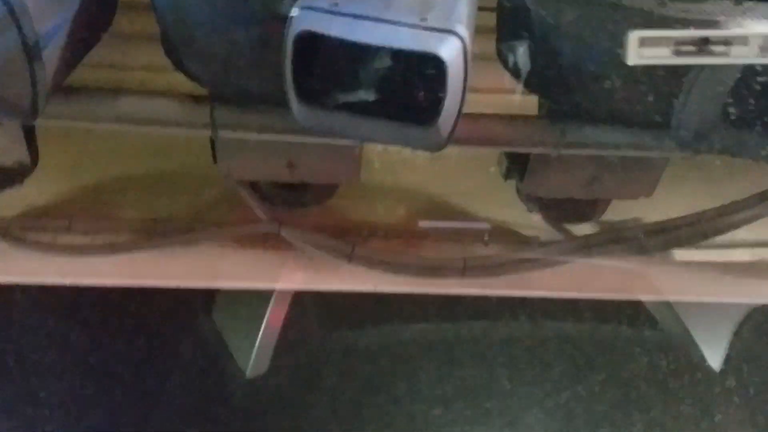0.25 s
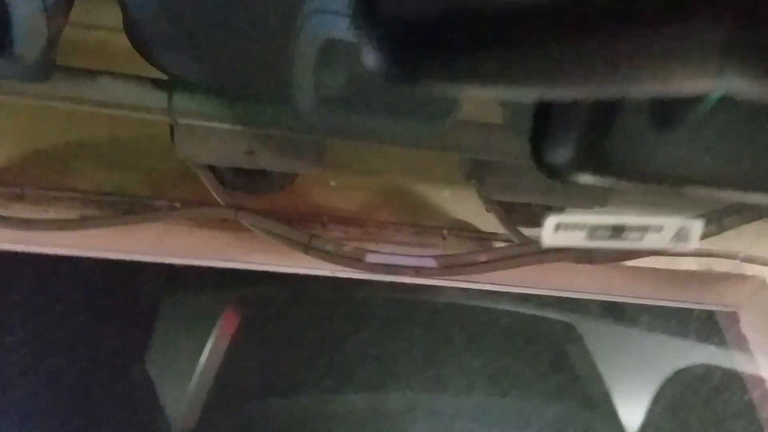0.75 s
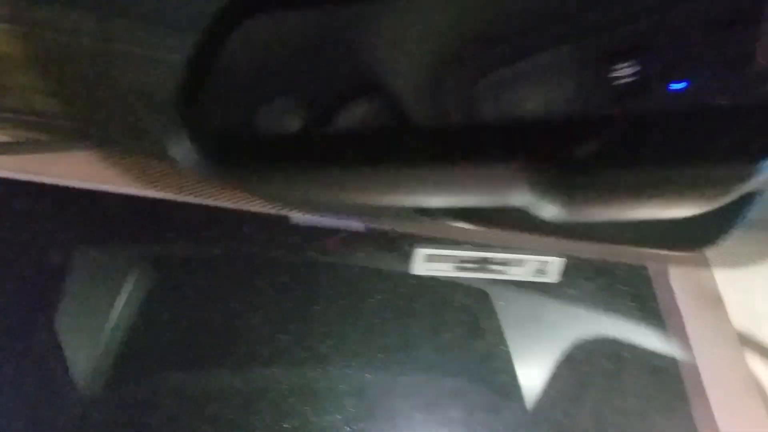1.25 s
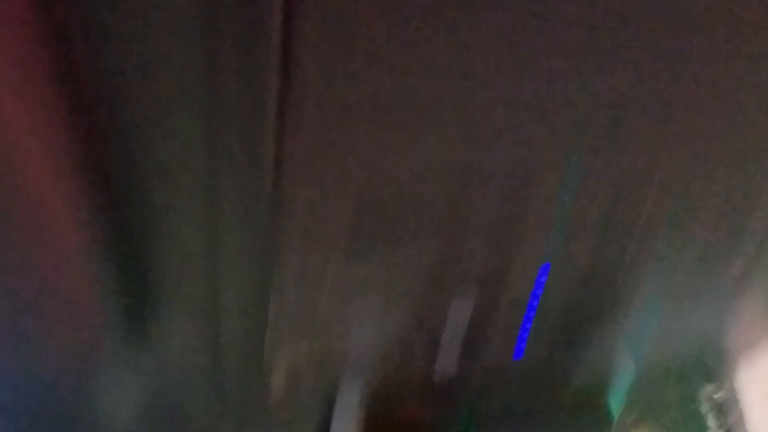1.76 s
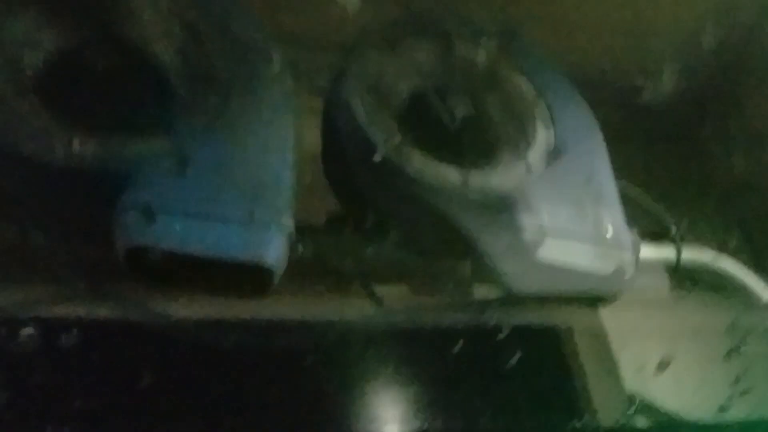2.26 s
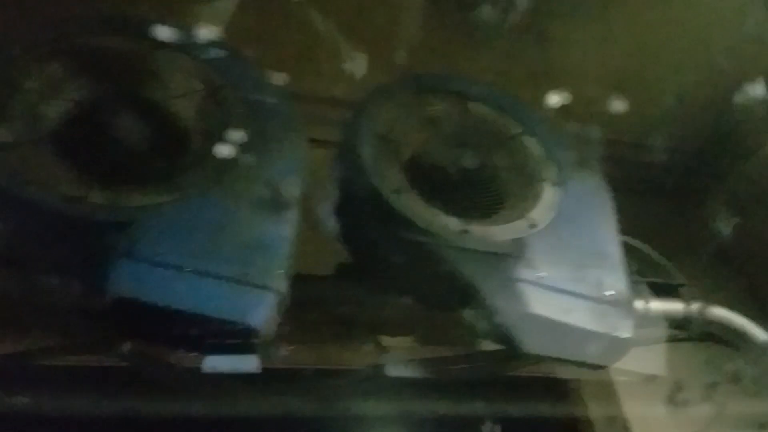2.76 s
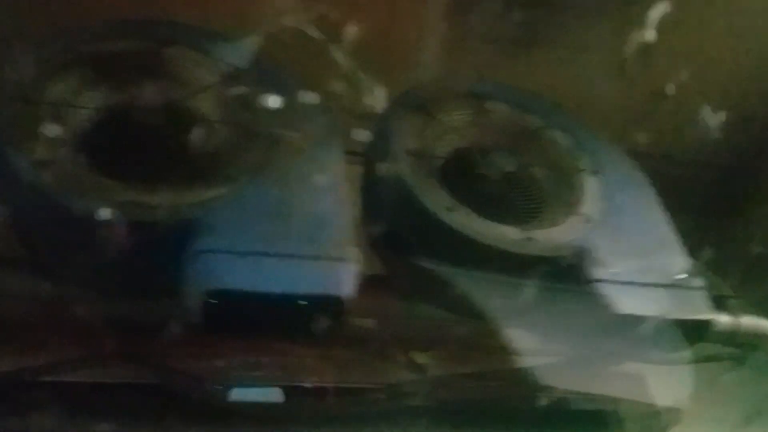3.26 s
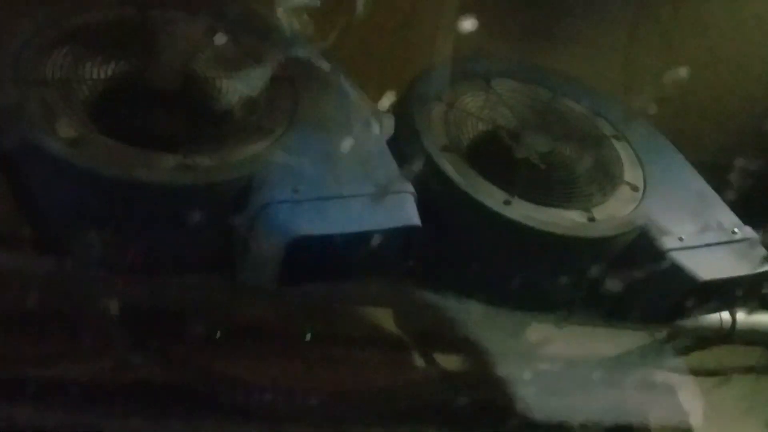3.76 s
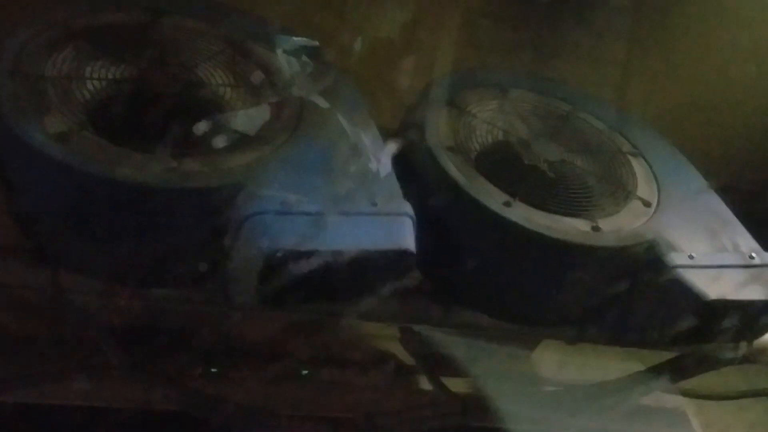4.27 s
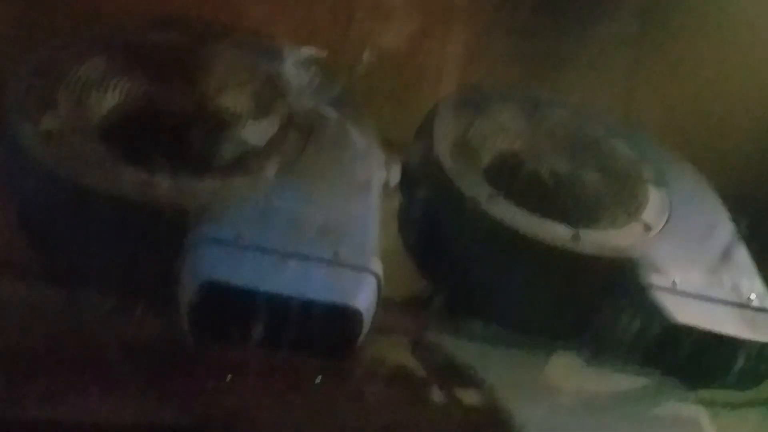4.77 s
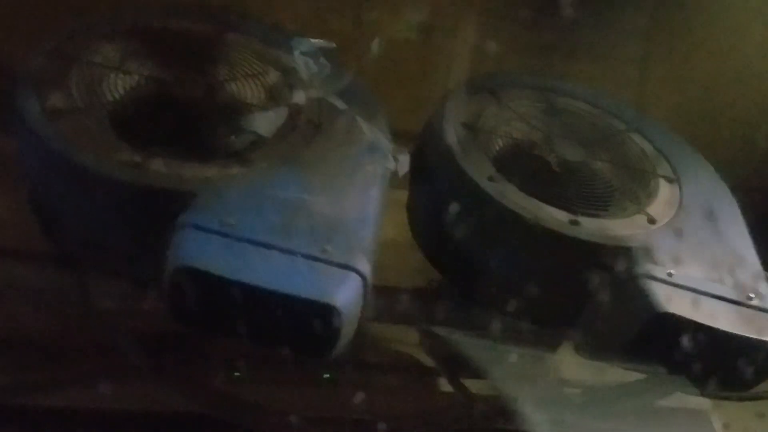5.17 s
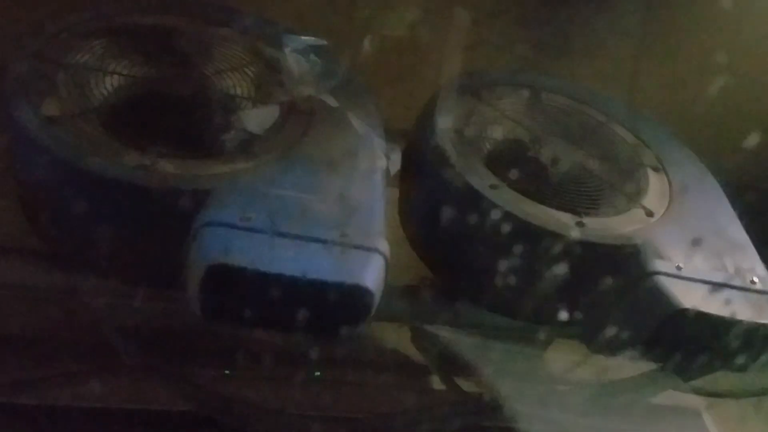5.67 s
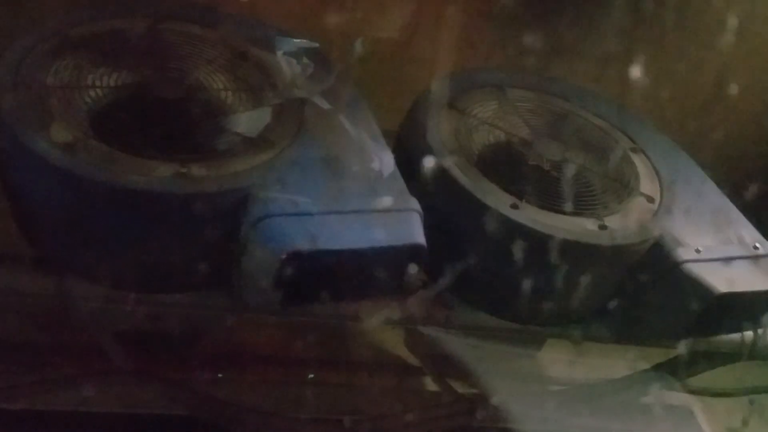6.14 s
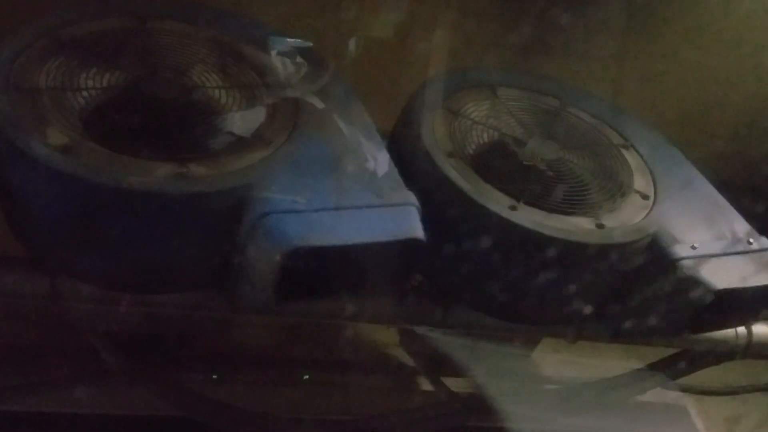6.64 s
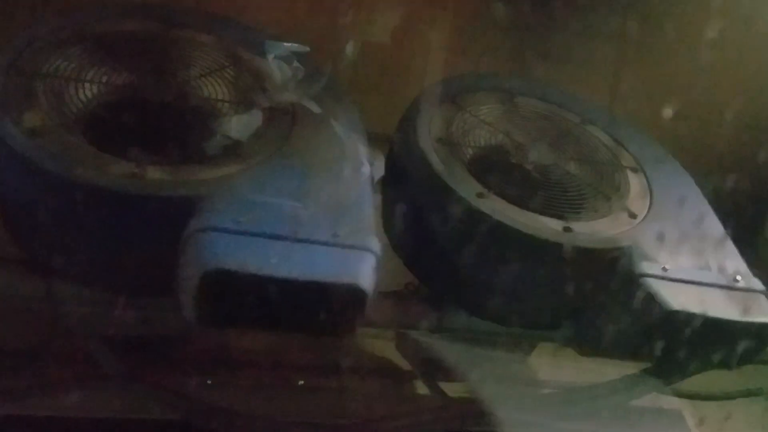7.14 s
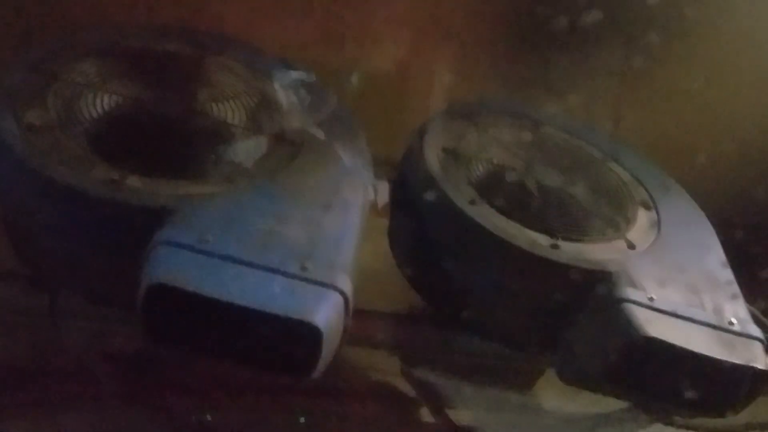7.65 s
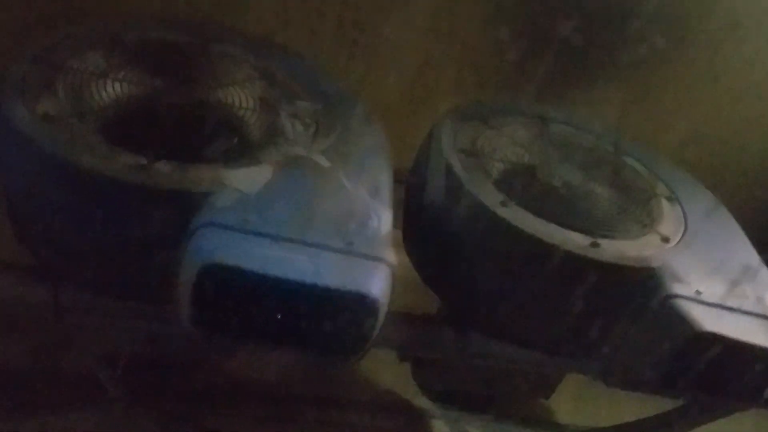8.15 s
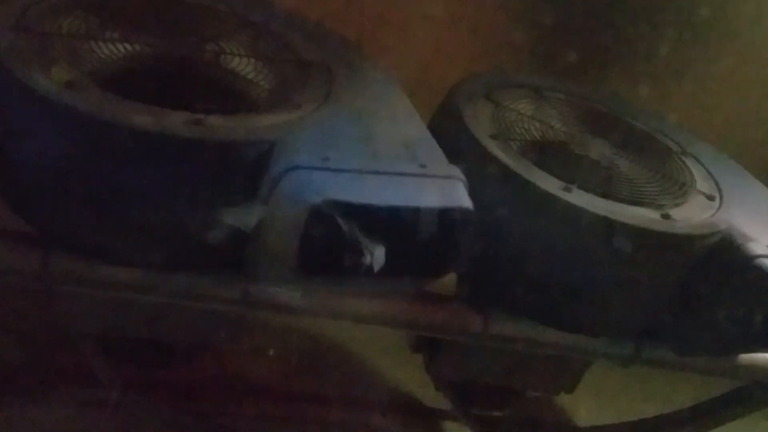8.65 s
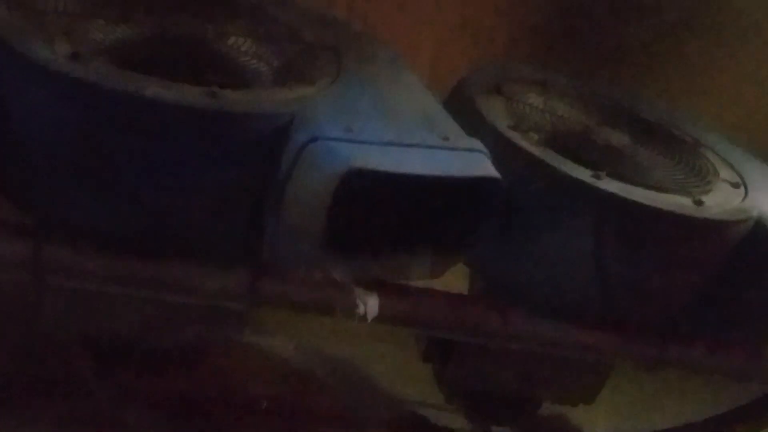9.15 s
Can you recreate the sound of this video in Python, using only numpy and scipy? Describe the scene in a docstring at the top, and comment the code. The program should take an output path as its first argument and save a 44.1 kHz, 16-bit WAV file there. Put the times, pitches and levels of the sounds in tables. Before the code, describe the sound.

Inside a car at a car wash, big dryer blowers roar steadily over the glass with low buffeting, wavering whine and fine spray hiss.

```python
"""Inside a car at a car wash, creeping underneath the dryer blowers.
Air jets buffet the body: cabin resonances ring as filtered noise and as hums that swell and fade.
The air roars and hisses over the glass as coloured noise, and flings mist and droplets (random impulses) at it.
Fan blades add a wavering whine of two partials each.
The microphone is swung round early on, with a faint rustle and a change in the cabin modes."""
import sys
import numpy as np
from scipy import signal
from scipy.fft import rfft, irfft
from scipy.io import wavfile
from scipy.ndimage import uniform_filter1d, minimum_filter1d

SR = 44100
rng = np.random.default_rng(int(sys.argv[2]) if len(sys.argv) > 2 else 0)


def bounce(signal):
    """Save signal as a 16-bit WAV file at the path given by the first command-line argument."""
    frames = np.transpose(np.atleast_2d(signal))
    limited = np.clip(frames, -1, 1)
    pcm = np.round(limited * 32767).astype(np.int16)
    wavfile.write(sys.argv[1], SR, pcm)


N = 414981
TIME = np.arange(N) / SR
HZ = np.fft.rfftfreq(N, 1 / SR)

# spectrum of air hissing over the glass: f/Hz, relative density/dB per Hz
HISS_SPECTRUM = [(1200, -19.5), (2000, 0.5), (2400, -2), (3000, -2), (3600, -1.5), (4500, -6.5),
                 (5300, -12.5), (6200, -16.5), (6900, -19), (7500, -27.5), (10000, -43), (16000, -58.5)]

# the roar eases as the air moves from the windscreen on to the roof
LEAVE_S, LEAVE_LENGTH_S = 3.93, 0.8
ROAR_ON_DB = -21.5  # base roar with the air on the windscreen; also the reference for the whine


def gain_of(db):
    """Definition of the decibel: amplitude ratio from level."""
    return 10 ** (np.asarray(db) / 20)


def evened(x):
    """Power normalization: scales to rms 1."""
    return x / np.sqrt(np.mean(x ** 2) + 1e-20)


def read(points):
    """Spectral interpolation: (f/Hz, value) rows, linear in log frequency."""
    f, value = np.transpose(points)
    return np.interp(np.log(HZ + 1), np.log(f + 1), value)


def ramp(middle_s, length_s):
    """Linear transition from 0 to 1."""
    return np.clip((TIME - middle_s) / length_s + 0.5, 0, 1)


def gust(middle_s, length_s, steepness=3):
    """Super-Gaussian pulse: a rounded rise, hold and fall of height 1."""
    distance = abs(2 * (TIME - middle_s) / length_s)
    return np.exp(-np.minimum(distance, 4) ** steepness)


def bursts(rows):
    """Critically damped impulse responses: a quick swell and slower fall from each (t/s, level/dB, length/s)."""
    envelope = np.zeros(N)
    for start_s, db, length_s in rows:
        u = np.clip((TIME - start_s) / (length_s / 3), 0, 20)  # peaks at u = 1
        envelope += gain_of(db) * u * np.exp(1 - u)
    return envelope


def wander(rate_hz, points=4096):
    """Low-pass random modulation of rms 1, with a Gaussian spectrum of scale rate_hz."""
    hz = np.fft.rfftfreq(points, TIME[-1] / points)
    lowpass = np.exp(-0.5 * (hz / rate_hz) ** 2)
    slow = irfft(rfft(rng.standard_normal(points)) * lowpass)
    return np.interp(TIME, np.linspace(0, TIME[-1], points), evened(slow))


def at_ports(shape, drive=None):
    """Partial coherence: two independent signals mixed to two microphone ports, whose mean has rms 1."""
    # coherence of the ports: f/Hz, signed left-right correlation
    likeness = [(30, .98), (60, .93), (150, .94), (290, .86), (640, .52), (1000, .22), (1300, -.15),
                (1850, -.33), (2300, .22), (2900, .17), (3300, -.12), (3600, -.5), (3950, -.38),
                (4400, -.05), (7000, .03)]
    # balance of the ports: f/Hz, left minus right level/dB
    balance = [(60, -1), (150, -1), (1100, -0.8), (1600, -3.5), (2350, 1.5), (3000, -.5), (4700, -1),
               (5800, 2.5), (6600, 2.5), (8000, -0.3), (9000, 8), (10300, 5.5), (13000, 3), (15500, 3)]
    a, b = rfft(rng.standard_normal((2, N)) if drive is None else drive)
    like = np.clip(read(likeness), -1, 1)
    lean = gain_of(read(balance) / 2)
    mid = a * np.sqrt(1 + like)
    side = b * np.sqrt(1 - like)
    pair = irfft(np.array([(mid + side) * lean, (mid - side) / lean]) * shape, N)
    return pair / np.std(pair.mean(0))


def cabin(split_hz=133, low_cut_hz=36, top_hz=385, buffet_db=0.9, drum_db=0, swing_s=1.94, swing_length_s=1.0):
    """Modal resonance: turbulence rings the cabin air and panels; microphone position weights the modes."""
    # cabin modes: f/Hz, half-power width/Hz, relative level/dB before the swing, relative level/dB after
    mode_table = [(46.5, 15, -3, -3), (80, 10, 0.5, -6), (104, 32, -3, 2.5), (125, 24, 3, -2),
                  (151, 25, -1.5, 3.5), (188, 36, -14, -1.5), (230, 78, -1.5, -7), (256, 46, 1, 2),
                  (286, 27, -8, 3), (353, 32, -4, -5)]
    # pressure of the air on the panels: t/s, drumming level/dB
    drum_table = [(0.05, -16), (1.21, -17), (2.69, -14), (3.29, -15), (4.35, -12), (6.47, -12.5),
                  (6.65, -10.5), (7.61, -15.5), (8.13, -9), (8.44, -14), (8.65, -9.5), (9.35, -13)]
    # hums where a jet catches a mode: start t/s, length/s, f/Hz, level/dB relative to the other hums
    howl_table = [(0.347, 1, 80, -6), (2.35, 0.41, 130, 3), (2.6, 0.51, 188, -1.5), (3.198, 0.56, 103, 2),
                  (4.0, 0.38, 150, -0.5), (4.251, 0.91, 104, -1), (5.155, 0.31, 275.2, -4),
                  (5.556, 0.47, 103, 1), (5.65, 0.51, 148, -3.5), (6.15, 0.47, 272.4, -4.5),
                  (6.45, 0.36, 151, 0), (6.798, 0.48, 104, -6), (7.8, 0.55, 264, 1), (8.05, 0.47, 152, 0.5),
                  (8.15, 0.47, 104, 0.5), (8.7, 0.8, 151, -3)]
    buffet = buffet_level()
    drum = np.interp(TIME, *np.transpose(drum_table))
    swing = ramp(swing_s, swing_length_s) * np.pi / 2  # angle of an equal-power crossfade
    hz, width, before, after = np.transpose(mode_table)
    modes = 1 / (1 + (2 * (HZ - hz[:, None]) / width[:, None]) ** 2)  # power responses
    band = 1 / (1 + (low_cut_hz / (HZ + 1)) ** 16) / (1 + (HZ / top_hz) ** 10)
    deep = 1 / (1 + (HZ / split_hz) ** 12)
    out = np.zeros((2, N))
    # buffeting drives the deep modes, drumming the higher ones
    for is_deep, part, level in ((True, deep, buffet + buffet_db), (False, 1 - deep, drum + drum_db)):
        first, second = (at_ports(np.sqrt(gain_of(db) ** 2 @ modes * band * part)) for db in (before, after))
        rumble = np.cos(swing) * first + np.sin(swing) * second
        hums = howls([row for row in howl_table if (row[2] < split_hz) == is_deep])
        # a singing mode draws its energy from the same push as the rumble
        out += gain_of(level) * steadied(rumble + hums)
    return out


def buffet_level(unrest_db=1.0, unrest_hz=4):
    """Unsteady aerodynamic load in dB: a sagging level ahead of the blowers, surges underneath them."""
    under_s, under_length_s = 3.62, 0.32  # the car rolls into the full force of the jets
    ahead_db, under_db, sag_db_per_s = -14.5, -20, 0.73
    under = ramp(under_s, under_length_s)
    ahead = ahead_db - sag_db_per_s * TIME
    return (1 - under) * ahead + under * under_db + passes() + unrest_db * wander(unrest_hz)


def passes():
    """Periodic forcing: extra push in dB as the nozzles swing a jet on to the car, about every 1.2 s."""
    # jets landing on the car: middle t/s, length/s, extra buffeting level/dB
    pass_table = [(4.618, .52, 6.5), (5.765, 0.29, 8.5), (7.005, 0.55, 6), (8.3, 0.54, 5.5), (9.43, .24, 5)]
    return sum(db * gust(s, length) for s, length, db in pass_table)


def howls(rows, drift_hz=3.52, drift_rate_hz=7, howl_db=-2, throb_db=0.6, throb_hz=20):
    """Flow-excited resonance: narrow hums swell and fade while turbulence shakes pitch and strength."""
    out = np.zeros(N)
    drift = drift_hz * wander(drift_rate_hz)
    for start_s, length_s, hz, db in rows:
        on = (TIME >= start_s) & (TIME < start_s + length_s)
        swell = np.sin(np.pi * (TIME[on] - start_s) / length_s)
        phase = 2 * np.pi * np.cumsum(hz + drift[on]) / SR
        out[on] += np.sqrt(2) * gain_of(db) * swell * np.sin(phase)
    return out * gain_of(howl_db + throb_db * wander(throb_hz))


def steadied(pair, size=5500):
    """Envelope normalization: evens the slow level of narrow noise and keeps its quick throbbing."""
    slow_power = uniform_filter1d(uniform_filter1d(pair.mean(0) ** 2, size), size // 2)
    return pair / np.sqrt(slow_power + 1e-9)


def jets(roar_db=0, hiss_db=-1.33, roar_flutter_db=0.68, hiss_flutter_db=1.0, flutter_hz=28, gust_db=0.34, gust_hz=4):
    """Turbulent flow noise: air rushes over the glass and its eddies flutter roar and hiss together."""
    # spectrum of the roar over the glass: f/Hz, relative density/dB per Hz
    roar_spectrum = [(250, -9.5), (395, -2.5), (440, 0.5), (560, -1), (720, -3.5), (860, -7), (960, -10.5),
                     (1050, -9), (1230, -12), (1500, -15), (1850, -22.5), (2400, -31.5), (4000, -60.5)]
    eddies = wander(flutter_hz)
    gusts = gain_of(gust_db * wander(gust_hz))
    roar_gain = gain_of(roar_level() + roar_db + roar_flutter_db * eddies)
    hiss_gain = gain_of(hiss_level() + hiss_db + hiss_flutter_db * eddies)
    roar = roar_gain * at_ports(gain_of(read(roar_spectrum)))
    hiss = hiss_gain * at_ports(gain_of(read(HISS_SPECTRUM)))
    return gusts * (roar + hiss)


def roar_level():
    """Flow-noise level in dB: roar builds on the windscreen, eases, gives way at passes and flares."""
    reach_s, reach_length_s = 1.52, 2.1  # the air reaches the windscreen
    ahead_db, after_db = -24.5, -23
    duck = 0.11  # dB of roar lost for each dB of a pass
    build = (ROAR_ON_DB - ahead_db) * ramp(reach_s, reach_length_s)
    ease = (after_db - ROAR_ON_DB) * ramp(LEAVE_S, LEAVE_LENGTH_S)
    return ahead_db + build + ease - duck * passes() + flares()


def hiss_level():
    """High-frequency flow-noise level in dB: it steps up, falls in two steps and lifts with each flare."""
    face_s, face_length_s = 1.8, 0.35  # the microphone comes to face the blowers
    behind_s, behind_length_s = 6.75, 0.5  # the jets move on
    ahead_db, on_db, after_db, behind_db = -45.6, -43.5, -45.5, -47
    flare_share = 0.35  # dB of hiss gained for each dB of a flare
    rise = (on_db - ahead_db) * ramp(face_s, face_length_s)
    first_fall = (after_db - on_db) * ramp(LEAVE_S, LEAVE_LENGTH_S)
    second_fall = (behind_db - after_db) * ramp(behind_s, behind_length_s)
    return ahead_db + rise + first_fall + second_fall + flare_share * flares()


def flares():
    """Moving-source modulation: extra roar in dB while a jet swings across the windscreen."""
    # flares of the roar: middle t/s, length/s, extra level/dB
    flare_table = [(3.203, .2, 0.9), (3.83, 0.22, 1.5), (5.07, 0.23, 2), (5.42, 0.54, 1.1), (6.38, 0.3, 2),
                   (6.838, 0.33, 1.5), (8.65, .5, 1.1)]
    return sum(db * gust(s, length) for s, length, db in flare_table)


def air_tones():
    """Band-limited noise: bands of noise boom, moan or whistle; some only brighten the hiss briefly."""
    # bands of noise: middle t/s, length/s, level/dB, f/Hz, half-width to 1/e amplitude/Hz
    tone_table = [(.3, 2.4, -51.5, 2470, 450), (.3, 2.1, -41.5, 1150, 90), (1.45, 0.57, -26.5, 430, 41),
                  (2.3, 1.7, -31, 464, 45), (2.5, 1.1, -54.5, 4300, 600), (5.399, 4.2, -27, 46, 11),
                  (5.5, 8.7, -60, 3700, 301), (8.9, 1.2, -47, 1650, 350), (9.297, .05, -43, 2150, 450)]
    out = np.zeros((2, N))
    for middle_s, length_s, db, hz, width_hz in tone_table:
        band = np.exp(-((HZ - hz) / width_hz) ** 2)
        out += gain_of(db) * gust(middle_s, length_s) * at_ports(band)
    return out


def water(drops_per_s=1500, spread_db=3, clump_db=2, clump_hz=25, mist_db=-2.5, drops_db=-7, patter_db=-12, splash_db=-1):
    """Random impact noise: fine mist and clumped droplets strike the glass, with some larger splashes."""
    # spectrum of spray on the glass: f/Hz, relative density/dB per Hz
    spray_spectrum = [(3000, -16), (6000, -5.5), (7000, 3), (8100, 3.5), (9100, 2.5), (10000, 0.5),
                      (11500, 0.5), (13500, -3), (15700, -6.5)]
    # larger splashes on the glass: start t/s, relative peak level/dB, length/s
    splash_table = [(.55, -66.5, .03), (1.28, -68, .03), (2.24, -71, 0.041), (2.41, -66, .03),
                    (3.225, -66, .04), (3.645, -63, 0.027), (4.41, -67, 0.03), (4.71, -70, .025),
                    (8.3, -69, .08), (9.12, -67, .025)]
    base_db, spray_per_hiss_db = -64, 0.4  # spray follows the hiss
    dry_glass_db, wet_s, wet_length_s = -1.5, 1.7, 0.4  # less spray before the water is blown up
    hiss = hiss_level()
    dryness = 1 - ramp(wet_s, wet_length_s)
    spray = base_db + spray_per_hiss_db * (hiss - hiss.mean()) + dry_glass_db * dryness
    size_db = spread_db * np.minimum(rng.exponential(1, (2, N)), 4)
    size = gain_of(size_db + clump_db * wander(clump_hz))
    struck = rng.random((2, N)) < drops_per_s / SR
    drops = size * rng.choice([-1, 1], (2, N)) * struck
    colour = gain_of(read(spray_spectrum))
    mist_gain = gain_of(spray + mist_db) + gain_of(splash_db) * bursts(splash_table)
    mist = mist_gain * at_ports(colour)
    ticks = gain_of(spray + drops_db) * at_ports(colour, drops)
    # the same drops, dulled by the glass
    patter = gain_of(hiss + patter_db) * at_ports(gain_of(read(HISS_SPECTRUM)), drops)
    return mist + ticks + patter


def windows(pair, count=12, echo_db=-16):
    """Comb filtering: close reflections off windows and dashboard, different at each port."""
    taps = np.zeros((2, SR // 40))
    at = rng.integers(SR // 400, taps.shape[1], (2, count))  # delays of 2.5 to 25 ms
    echoes = gain_of(echo_db) * rng.choice([-1, 1], at.shape) / np.sqrt(count)
    np.put_along_axis(taps, at, echoes, 1)
    taps[:, 0] = 1  # direct sound
    return signal.oaconvolve(pair, taps / np.linalg.norm(taps[0]), axes=1)[:, :N]


def fans(whine_db=1.5, drift_hz=3.2, drift_rate_hz=7, ragged=0.5, ragged_hz=10, port_turn_rad=0.76, fade_db=1.45, fade_hz=4):
    """Blade-passing tones: each impeller sings at its blade rate and octave; moving air scatters the tone."""
    # one row a fan: blade-passing f/Hz, relative level/dB, relative level/dB of the octave
    fan_table = [(521.8, 2.5, -11), (518, -13, -15)]
    base_db, whine_per_roar_db = -30.5, 3.5  # the whine follows the roar, more steeply
    level = base_db + whine_per_roar_db * (roar_level() - ROAR_ON_DB) + fade_db * wander(fade_hz)
    out = np.zeros((2, N))
    for hz, db, octave_db in fan_table:
        turning = 2 * np.pi * np.cumsum(hz + drift_hz * wander(drift_rate_hz)) / SR
        phase = turning + np.array([[0], [port_turn_rad]])
        for multiple, partial_db in ((1, db), (2, octave_db)):
            direct = 1 + ragged * wander(ragged_hz)
            scattered = ragged * wander(ragged_hz)
            tone = direct * np.sin(multiple * phase) + scattered * np.cos(multiple * phase)
            out += gain_of(partial_db) * tone
    return gain_of(level + whine_db) * out


def rustle(left_db=1.0):
    """Friction noise: thin, high scuffs as the microphone is swung round, leaning to the left."""
    # scuffs by the microphone: start t/s, peak level/dB, length/s
    scuff_table = [(1.903, -58, .04), (1.955, -65, .03), (1.99, -65, .022)]
    # spectrum of a scuff: f/Hz, relative density/dB per Hz
    scuff_spectrum = [(8000, -30), (10200, -13.5), (10900, 0), (11600, -4), (12300, 3), (13000, -10),
                      (15500, -20)]
    scuffs = bursts(scuff_table) * at_ports(gain_of(read(scuff_spectrum)))
    return scuffs * gain_of([[left_db], [-left_db]])


def scene():
    """Superposition of everything that reaches the cabin."""
    return cabin() + windows(jets() + air_tones() + water()) + fans() + rustle()


def record(dry):
    """Peak limiting and band limiting: look-ahead gain rounds off high swings, then a low-pass follows."""
    ceiling, size, edge_hz = 0.96, 200, 15760  # size in samples
    room = np.minimum(1, ceiling / (abs(dry).max(0) + 1e-9))
    lowest = minimum_filter1d(room, 2 * size)
    gain = uniform_filter1d(uniform_filter1d(lowest, size), size)
    gain = gain * signal.windows.tukey(N, size / N)  # soft ends
    lowpass = signal.firwin(511, edge_hz, window=("kaiser", 9), fs=SR)
    return signal.oaconvolve(dry * gain, lowpass[None], "same")


dry = scene()
out = record(dry)
bounce(out)
```